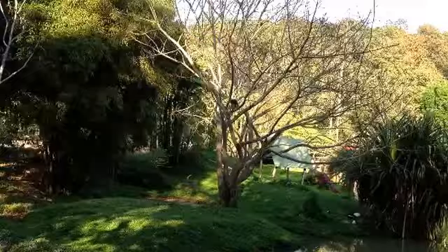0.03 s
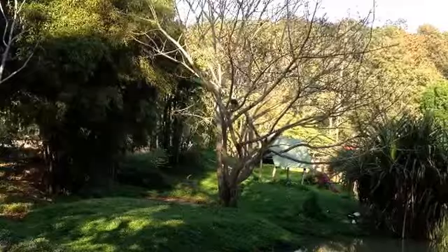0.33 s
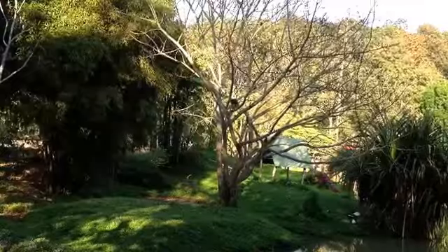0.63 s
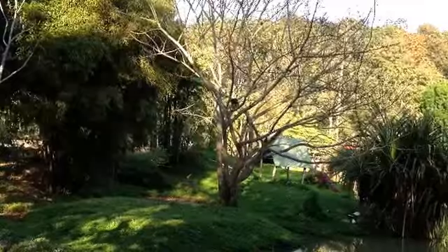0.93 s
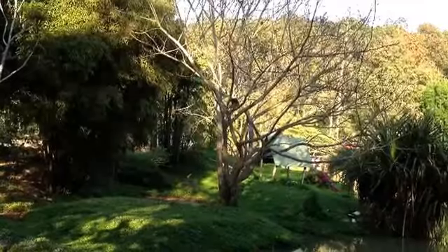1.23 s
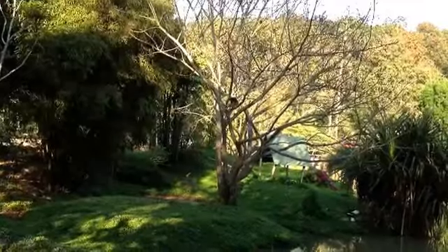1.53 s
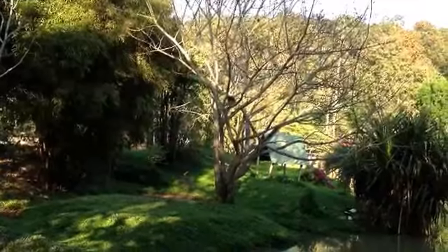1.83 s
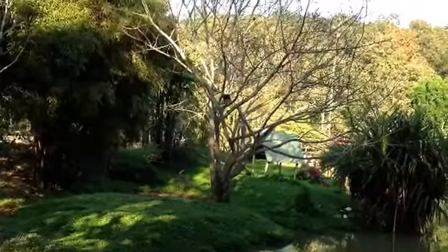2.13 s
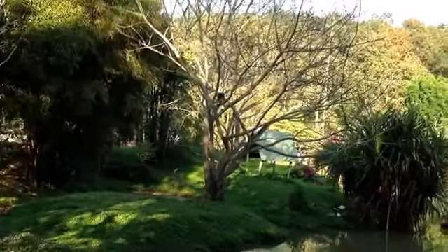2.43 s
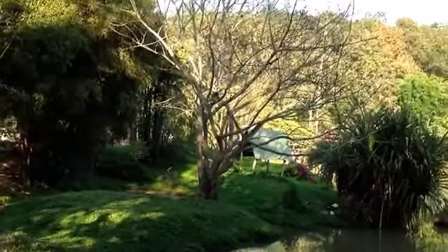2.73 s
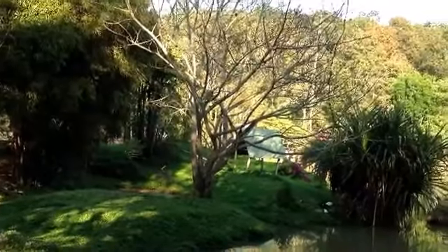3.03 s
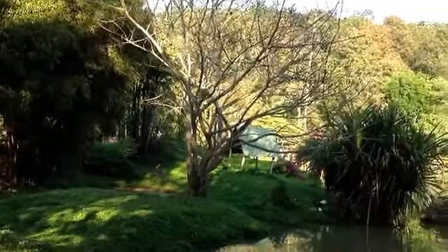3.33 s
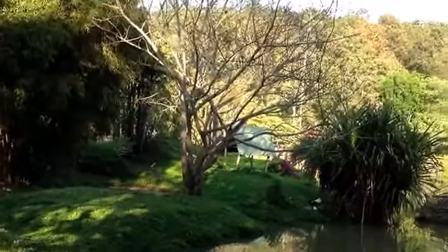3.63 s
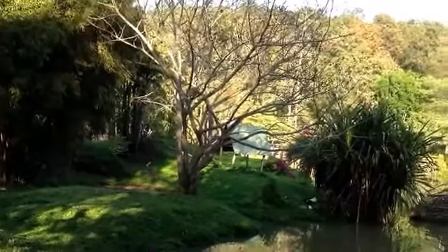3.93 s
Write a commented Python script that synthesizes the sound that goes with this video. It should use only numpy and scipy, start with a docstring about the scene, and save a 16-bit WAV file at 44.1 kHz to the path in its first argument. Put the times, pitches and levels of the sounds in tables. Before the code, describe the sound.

An ape gives four long rising hoots while birds whistle and chip over quiet outdoor air.

```python
"""Over quiet outdoor air an ape, probably a gibbon, starts the first of four long rising hoots across
a garden pond: almost pure tones that the trees throw back. A bird joins at once with the first of three
steep falling whistles, and soft peeps, faint ticks and far-off rasps begin to dot the scene. From 1.6 s
a smaller bird chips. Around 2 s an overtone rings briefly as the second hoot flicks upward, and two
sharp snaps sound close by. The birds then thin out, and the fourth hoot climbs over a long, soft rasp."""
import sys
import numpy as np
from scipy import signal
from scipy.fft import rfft, irfft
from scipy.io import wavfile
from scipy.ndimage import uniform_filter1d

SR = 44100
rng = np.random.default_rng(int(sys.argv[2]) if len(sys.argv) > 2 else 0)


def digitize_waveform(pressure):
    """Quantize a signal to 16-bit integers and store it at the path in sys.argv[1].

    Rows of a 2-D input are taken as channels; values are limited to [-1, 1].
    """
    field = np.atleast_2d(pressure).T
    bounded = np.clip(field, -1, 1)
    quanta = np.round(bounded * 32767).astype(np.int16)
    wavfile.write(sys.argv[1], SR, quanta)


N = 176400
T = np.arange(N) / SR

# tone of the air bed: frequency_hz, gain_db
AIR_EQ = [(25, -32), (60, -21), (110, -9), (200, 2.5), (400, -.5), (800, -2.5), (1500, -5), (2500, -9),
          (4200, -6.5), (6000, -8), (8200, -13), (9500, -22.5), (12000, -18), (15000, -15)]
# time the garden's echo takes to fall 60 dB: frequency_hz, decay_s
GARDEN_DECAY = [(300, 1.2), (650, .9), (1800, 0.62), (4000, 0.54), (8000, 0.55), (15000, .25)]
# soft bands of noise: start_s, length_s, centre_hz, width_hz, level_db
# the row at 1.94 s is a brief narrow ring of the ape's overtone as the second hoot flicks upward;
# the others are distant rasps and rustles
NOISE_BANDS = [(0.4, 0.2, 6800, 800, -65), (.595, 0.036, 880, 190, -50), (0.68, 0.24, 5000, 1900, -64),
               (1.39, 0.12, 6600, 600, -64.5), (1.925, 0.11, 5500, 3200, -58.5),
               (1.94, 0.06, 4100, 250, -54), (2.03, 0.24, 4900, 1100, -61), (2.51, 0.06, 850, 220, -58),
               (3.1, 0.21, 5600, 2200, -62.5), (3.49, 0.58, 2620, 260, -63), (3.49, 0.56, 3900, 650, -63)]
# faint ticks: start_s, gain_db, centre_hz, width_octaves
TICKS = [(.296, -54.5, 12900, .12), (.337, -45, 12500, 0.15), (.617, -45, 12300, .25),
         (2.239, -47, 9260, .8), (2.538, -44, 12400, .3), (3.148, -51, 13100, .2), (3.468, -44, 12400, .2),
         (3.469, -41.5, 3600, .6), (3.579, -37, 4200, .25)]
# close snaps: start_s, gain_db, ring_hz
SNAPS = [(1.9645, -30.5, 4100), (2.1038, -27, 4100)]
# tone of a snap's crack: frequency_hz, gain_db
SNAP_EQ = [(100, -46), (400, -24), (1500, -1.5), (2700, -9), (4200, 2.5), (6000, -20), (8000, -0.5),
           (10000, -20.5), (14000, -7), (16000, -25)]
# soft peeps and thin far-off whistles: start_s, length_s, from_hz, to_hz, level_db
PEEPS = [(.2, .035, 3500, 2950, -62), (.87, .12, 2130, 2080, -66), (2.12, .23, 2280, 2370, -65),
         (2.82, .065, 3450, 2700, -56), (2.98, .1, 2660, 2730, -66)]
# the smaller bird's chips: start_s, level_db
CHIPS = [(1.623, -58), (1.747, -59.5), (1.88, -57.5), (2.062, -59.5), (2.143, -54), (2.673, -57),
         (2.859, -64), (3.101, -61)]
# contour of one falling whistle: offset_s, pitch_hz, gain_db
WHISTLE_SHAPE = [(0, 6100, -9), (.012, 6030, -0.5), (.025, 5750, -3.5), (0.041, 5720, -6),
                 (.054, 4950, -1.5), (.072, 4148, 5), (.097, 3620, 3.5), (.122, 3018, -1.5),
                 (0.143, 2477, -11.5), (.17, 2197, -19)]
# cues for that whistle: start_s, level_db
WHISTLES = [(.211, -50.5), (1.204, -51), (2.154, -51)]
# a slow climb per hoot, the first three closing with an upward flick: time_s, pitch_hz
HOOT_PITCH = [
    [(0, 530.5), (.15, 549.3), (.29, 568.9), (.48, 584.3), (.6, 594.8), (.7, 618), (.75, 628.5),
     (.77, 651.4), (.787, 705), (.8, 725)],
    [(1.045, 572.4), (1.085, 526.3), (1.12, 533.3), (1.25, 574), (1.39, 591.2), (1.55, 607.9),
     (1.73, 632.8), (1.84, 637.6), (1.935, 655.4), (1.985, 699.7), (2.005, 725.6)],
    [(2.255, 557.5), (2.3, 506.5), (2.36, 501.4), (2.5, 530.6), (2.63, 555.5), (2.73, 559.5), (3.07, 561.8),
     (3.095, 585), (3.115, 614), (3.15, 585.4)],
    [(3.365, 535), (3.42, 496.7), (3.46, 492.5), (3.55, 510.3), (3.63, 509), (3.78, 523.6), (4, 538.7)],
]
# envelope of the fundamental, one per hoot: time_s, level_db
HOOT_LEVEL = [
    [(0.0, -27), (0.238, -25), (0.302, -31), (0.432, -27), (0.49, -28), (0.554, -47), (0.644, -24.5),
     (0.694, -23), (0.726, -31), (0.768, -23.5), (0.782, -32), (0.8, -34.5)],
    [(1.048, -52.5), (1.064, -39.5), (1.088, -31.5), (1.12, -27.5), (1.21, -25), (1.24, -30.5),
     (1.322, -26), (1.35, -29.5), (1.4, -45.5), (1.44, -33), (1.498, -24.5), (1.576, -22), (1.66, -28.5),
     (1.716, -23.5), (1.916, -20.5), (1.966, -30), (1.992, -23.5), (2.003, -31.5)],
    [(2.258, -63), (2.272, -39), (2.294, -36.5), (2.352, -29), (2.45, -28.5), (2.504, -25), (2.75, -28),
     (2.974, -29.5), (3.048, -30), (3.087, -40.5), (3.103, -34), (3.115, -45), (3.128, -37), (3.15, -43)],
    [(3.365, -42), (3.375, -46), (3.423, -33.5), (3.471, -30.5), (3.661, -28.5), (3.763, -34), (4.0, -30)],
]
# envelope of the third harmonic, one per hoot: time_s, level_db
HOOT_THIRD = [
    [(0.01, -57.5), (0.072, -59), (0.136, -57.5), (0.3, -42), (0.466, -53), (0.676, -61), (0.758, -56),
     (0.81, -66)],
    [(1.045, -75.5), (1.053, -65.5), (1.219, -46), (1.443, -60.5), (1.733, -53.5), (1.943, -66),
     (1.969, -65), (2.015, -56.5)],
    [(2.255, -64), (2.409, -70), (2.449, -54), (2.493, -65), (2.611, -52.5), (2.727, -47.5), (3.129, -56),
     (3.15, -62)],
    [(3.365, -84), (3.421, -62), (3.431, -87.5), (3.469, -65.5), (3.673, -72), (3.685, -61.5),
     (3.829, -70.5), (3.99, -56.5)],
]
# brightness of the upper overtones, one row per hoot: gain_db, tilt_db_per_octave
HOOT_BRIGHTNESS = [(-44.5, 0), (-43.5, 0), (-49.5, -.5), (-46, -7)]
# broad throat colour on the upper overtones: frequency_hz, gain_db
THROAT_EQ = [(2100, -12), (2900, -8), (3250, -11), (3600, -1), (4200, 1), (4800, -7), (5400, -2),
             (6100, -9), (7000, -3), (7500, -4), (8100, 2), (8700, -3), (9300, -17), (10500, -3),
             (11200, -16), (12400, -16), (15000, -21)]
# narrow peaks that ring out as an overtone glides through: centre_hz, width_hz, boost_db
THROAT_PEAKS = [(3800, 55, 12), (3985, 50, 8), (4230, 70, 9), (4540, 40, 8), (5500, 60, 7), (5780, 40, 10),
                (6700, 35, 11), (7080, 90, 8), (7300, 50, 12), (7820, 45, 7), (8245, 50, 13),
                (10150, 40, 7)]


def amp(db):
    """Decibels to gain."""
    return 10 ** (np.asarray(db) / 20)


def unit(x):
    """Scales to rms 1."""
    return x / np.sqrt(np.mean(x ** 2) + 1e-20)


def read(points, hz):
    """Reads a spectrum table on a log-frequency axis."""
    f, value = np.transpose(points)
    return np.interp(np.log(hz + 1), np.log(f), value)


def curve(points, size=300):
    """An automation curve, its corners rounded over size samples."""
    return uniform_filter1d(np.interp(T, *np.transpose(points)), size)


def add(mix, start_s, sound):
    """Places a sound in the mix."""
    part = mix[max(round(start_s * SR), 0):][:len(sound)]
    part += sound[:len(part)]


def noise(shape, size):
    """Noise of rms 1 whose spectrum is shape(hz)."""
    return unit(irfft(rfft(rng.standard_normal(size)) * shape(np.fft.rfftfreq(size, 1 / SR)), size))


def air(level_db=-63.5, drift_db=1):
    """A quiet bed of outdoor air and leaves: noise in gently drifting patches."""
    frames = dict(nperseg=1024, noverlap=768)
    _, _, bed = signal.stft(noise(lambda f: amp(read(AIR_EQ, f)), N), SR, **frames)
    patches = uniform_filter1d(rng.standard_normal(bed.shape), size=14, axis=0)
    patches = unit(uniform_filter1d(patches, size=18, axis=1))
    return amp(level_db) * unit(signal.istft(bed * amp(drift_db * patches), **frames)[1][:N])


def garden_echo(x, build_s=.0052, decay_scale=1):
    """Sound scattered by the trees: a tail that builds over build_s, returned as loud as the send."""
    taps = rng.standard_normal(SR) * (rng.random(SR) < .1)
    hz, t, spectrum = signal.stft(taps, SR, nperseg=256)
    decay_s = decay_scale * read(GARDEN_DECAY, hz)[:, None]
    tail = signal.istft(spectrum * amp(-60 * t / decay_s), SR, nperseg=256)[1][:SR]
    tail *= 1 - np.exp(-(T[:SR] / build_s) ** 2)
    return unit(signal.fftconvolve(x, tail)[:N]) * np.std(x)


def ground_bounce(x, count=7, gain=.2, within_s=.028):
    """A few early reflections make each overtone swell and fade as it glides."""
    out = x.copy()
    for delay, polarity in rng.random((count, 2)):
        add(out, delay * within_s, gain * np.sign(polarity - .5) * x)
    return out / np.sqrt(1 + count * gain ** 2)


def noise_bands(rise_share=.41):
    """Bands of noise that swell and fade: far-off rasps, rustles and one ring of the ape's overtone."""
    out = np.zeros(N)
    for start, length, hz, width, level_db in NOISE_BANDS:
        progress = np.linspace(0, 1, int(length * SR))
        envelope = np.sin(np.pi / 2 * np.interp(progress, [0, rise_share, 1], [0, 1, 0]))
        band = noise(lambda f: np.exp(-.5 * ((f - hz) / width) ** 2), N)[:len(progress)]
        add(out, start, amp(level_db) * envelope * band)
    return out


def ticks(decay_s=.0011):
    """Tiny dry ticks: pinpoint bursts of band-passed noise."""
    out, t = np.zeros(N), T[:8192]
    for start, gain_db, hz, octaves in TICKS:
        burst = noise(lambda f: 1 / (1 + (np.log2((f + 1) / hz) / octaves) ** 2), len(t))
        add(out, start, .5 * amp(gain_db) * np.exp(-t / decay_s) * burst)
    return out


def snaps(attack_s=.0003, hold_s=.0015, decay_s=.0008, tail_s=.014, ring_s=.012):
    """Twig-like snaps: a hard crack of noise with a soft tail and a short ring."""
    out, t = np.zeros(N), T[:8192]
    attack = np.minimum(t / attack_s, 1)
    fall = np.exp(-np.maximum(t - hold_s, 0) / decay_s) + amp(-14) * np.exp(-t / tail_s)
    for start, gain_db, ring_hz in SNAPS:
        crack = .5 * fall * noise(lambda f: amp(read(SNAP_EQ, f)), len(t))
        ring = amp(-19) * np.exp(-t / ring_s) * np.sin(2 * np.pi * ring_hz * t)
        add(out, start, amp(gain_db) * attack * (crack + ring))
    return out


def bird_note(hz, gain, flutter_hz=220, pitch_depth=.007, flutter_db=2.5):
    """A gliding sine, roughened by a fast flutter in pitch and level."""
    wobble, flicker = (noise(lambda f: np.exp(-(f / flutter_hz) ** 2), SR)[:len(hz)] for _ in range(2))
    phase = 2 * np.pi * np.cumsum(hz * (1 + pitch_depth * wobble)) / SR
    envelope = gain * amp(flutter_db * np.minimum(flicker, 1)) * signal.windows.tukey(len(hz), .1)
    return envelope * np.sin(phase)


def peeps():
    """Soft, thin bird notes that fade in and out on a straight glide."""
    out = np.zeros(N)
    for start, length, from_hz, to_hz, level_db in PEEPS:
        progress = np.linspace(0, 1, int(length * SR))
        hz = from_hz + (to_hz - from_hz) * progress
        add(out, start, bird_note(hz, amp(level_db) * np.sin(np.pi * progress)))
    return out


def chips(length_s=.02, low_hz=2680, top_hz=4660):
    """The smaller bird: quick arches of pitch, loudest at the top."""
    out = np.zeros(N)
    arch = np.sin(np.linspace(0, np.pi, int(length_s * SR)))
    for start, level_db in CHIPS:
        add(out, start, bird_note(low_hz + (top_hz - low_hz) * arch, amp(level_db) * (1 + arch) / 2))
    return out


def whistles():
    """A bird's three whistles, each diving about an octave and a half."""
    out = np.zeros(N)
    offset_s, hz, gain_db = np.transpose(WHISTLE_SHAPE)
    t = np.arange(0, offset_s[-1], 1 / SR)
    for start, level_db in WHISTLES:
        envelope = amp(level_db + np.interp(t, offset_s, gain_db))
        add(out, start, bird_note(np.interp(t, offset_s, hz), envelope))
    return out


def birds(call_wet_db=3.5, peep_wet_db=-7):
    """Whistles and chips smeared by the foliage, with the peeps left drier."""
    calls, soft = whistles() + chips(), peeps()
    return calls + amp(call_wet_db) * garden_echo(calls) + soft + amp(peep_wet_db) * garden_echo(soft)


def swell(depth_db=4.5, rate_hz=4.5, size=1000):
    """Gain of one overtone, swelling and fading on its own."""
    hz = np.fft.rfftfreq(size, N / SR / size)
    drift = unit(irfft(rfft(rng.standard_normal(size)) * np.exp(-(hz / rate_hz) ** 2), size))
    return amp(depth_db * np.interp(T, np.linspace(0, T[-1], size), np.minimum(drift, 1)))


def throat_overtones(hz, phase, tilt_db, tilt_from_hz=4000, even_db=-2.5):
    """Harmonics 4 to 25 glide through the throat's broad humps, narrow peaks and treble tilt."""
    grid_hz = np.arange(10, SR / 2, 10)
    peaks_db = sum(db * np.exp(-((grid_hz - centre) / width) ** 2) for centre, width, db in THROAT_PEAKS)
    treble_db = tilt_db * np.maximum(np.log2(grid_hz / tilt_from_hz), 0)
    colour = amp(read(THROAT_EQ, grid_hz) + peaks_db + treble_db)
    out = np.zeros(N)
    for k in range(4, 26):
        gain = swell() * amp(even_db * (k % 2 == 0)) * np.interp(k * hz, grid_hz, colour)
        out += gain * np.sin(k * phase + 2 * np.pi * rng.random())
    return out


def hoot(pitch, level, third, brightness, fade_s=.014, settle_s=.05, flick_s=.045, flick_db=15):
    """An almost pure tone, unsteady at both ends; returns its body, overtones and echo send."""
    bright_db, tilt_db = brightness
    elapsed, remaining = T - level[0][0], level[-1][0] - T
    settled = np.clip(np.minimum(elapsed, remaining) / settle_s, 0, 1)
    jitter = (.003 + .02 * (1 - settled)) * noise(lambda f: 1 / (1 + (f / 40) ** 2), N)
    hz = curve(pitch) * (1 + jitter)
    phase = 2 * np.pi * np.cumsum(hz) / SR
    level_db = curve(level, size=600)
    body = amp(level_db) * np.sin(phase) + amp(curve(third)) * np.sin(3 * phase)
    second = amp(-32.5) * np.sin(2 * phase)
    sheen = amp(bright_db) * settled * throat_overtones(hz, phase, tilt_db)
    effort_db = -30 + .58 * (level_db + 30)  # overtones ride a compressed copy of the envelope
    overtones = amp(effort_db) * (second + sheen)
    send = body * amp(flick_db * np.clip(2 - remaining / flick_s, 0, 1))  # the close echoes most
    gate = np.clip(elapsed / fade_s, 0, 1) * np.clip(remaining / fade_s + 1, 0, 1)
    return np.sqrt(2) * np.sin(np.pi / 2 * gate) ** 2 * np.array([body, overtones, send])


def ape(treeline_build_s=.05):
    """Four hoots, with a short echo from nearby bushes and a longer one from the tree line."""
    hoots = zip(HOOT_PITCH, HOOT_LEVEL, HOOT_THIRD, HOOT_BRIGHTNESS)
    body, overtones, send = sum(hoot(*row) for row in hoots)
    bushes = amp(-30) * garden_echo(send, build_s=.016, decay_scale=.6)
    treeline = amp(-32) * garden_echo(send, treeline_build_s)
    treeline += amp(-16) * garden_echo(overtones, treeline_build_s)
    return body + ground_bounce(overtones) + bushes + treeline


def scene():
    """The whole garden in mono, with the ape out front."""
    return (ape() + birds() + noise_bands() + snaps() + ticks() + air())[None]


def record(dry, cutoff_hz=15500):
    """A steep low-pass trims the very top of the mix."""
    lowpass = signal.firwin(511, cutoff_hz, window=("kaiser", 9), fs=SR)
    return signal.oaconvolve(dry, lowpass[None], "same")


dry = scene()
out = record(dry)
digitize_waveform(out)
```